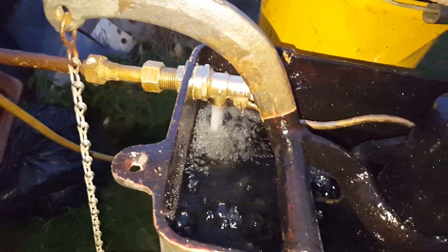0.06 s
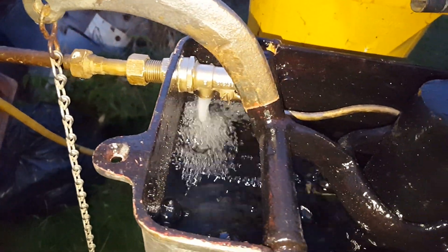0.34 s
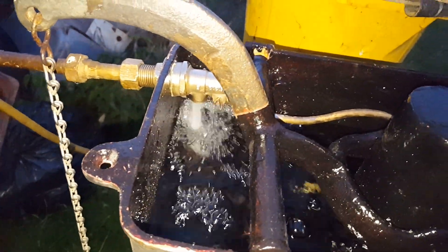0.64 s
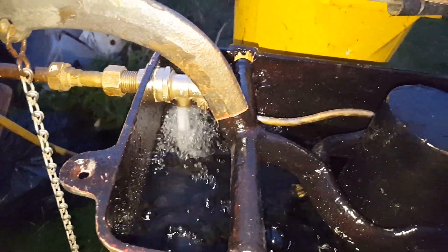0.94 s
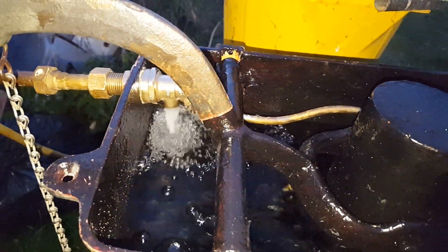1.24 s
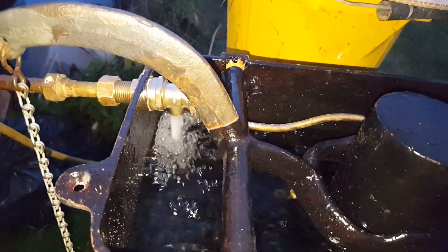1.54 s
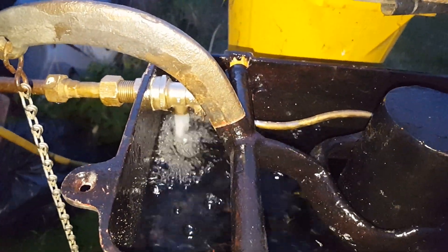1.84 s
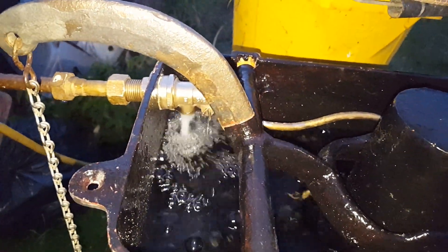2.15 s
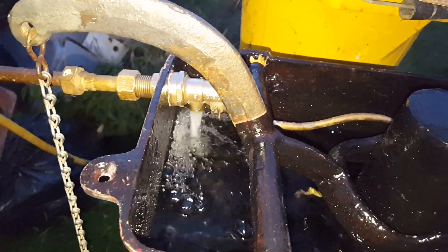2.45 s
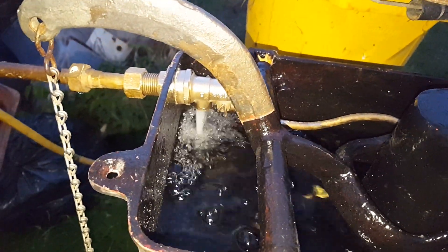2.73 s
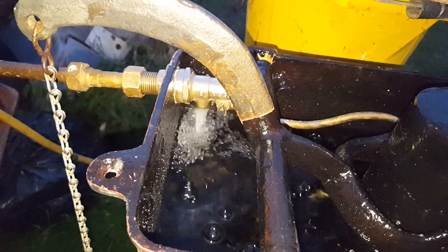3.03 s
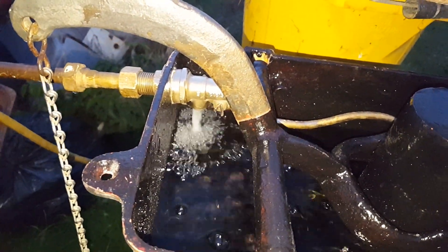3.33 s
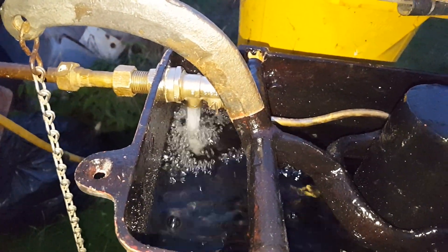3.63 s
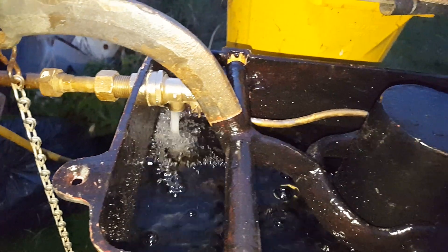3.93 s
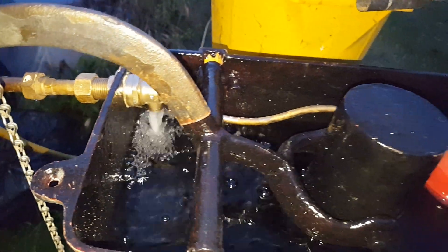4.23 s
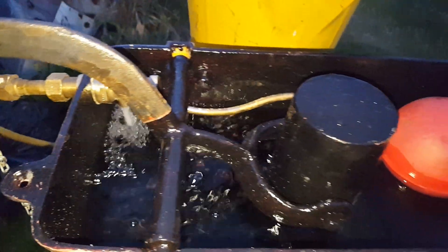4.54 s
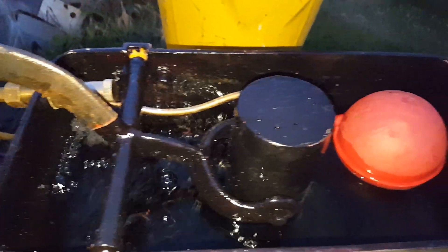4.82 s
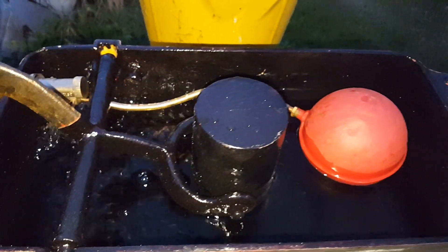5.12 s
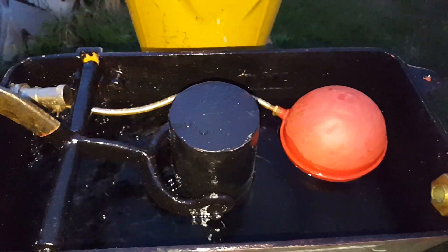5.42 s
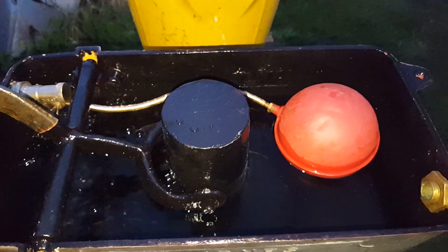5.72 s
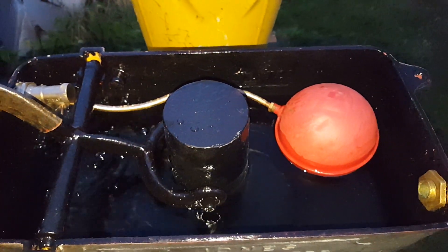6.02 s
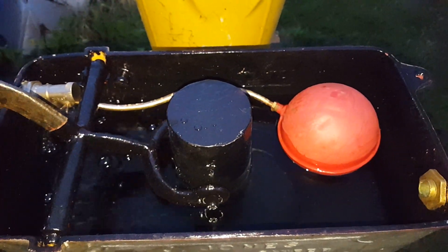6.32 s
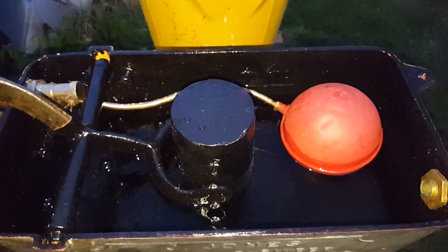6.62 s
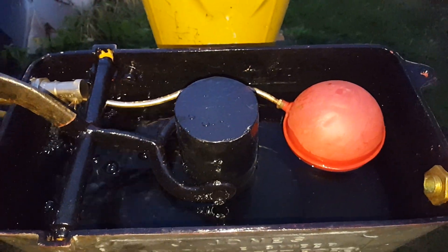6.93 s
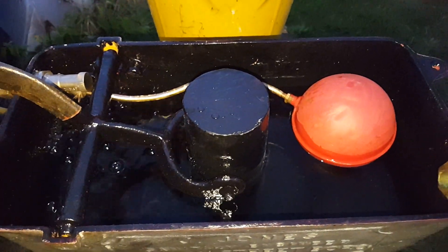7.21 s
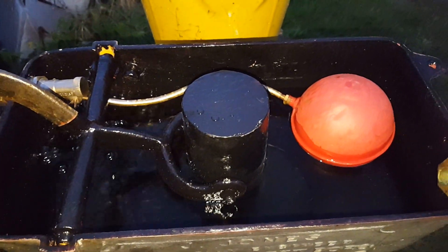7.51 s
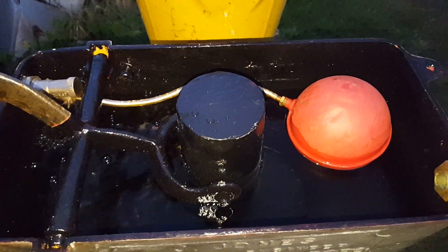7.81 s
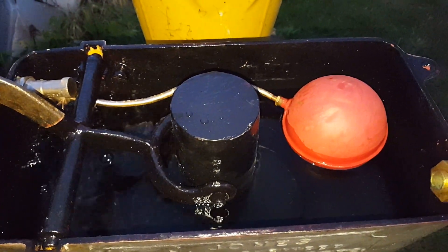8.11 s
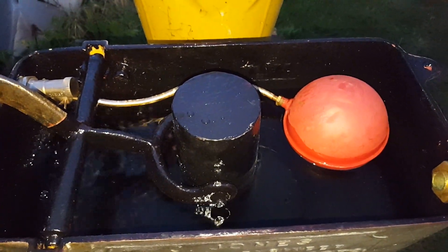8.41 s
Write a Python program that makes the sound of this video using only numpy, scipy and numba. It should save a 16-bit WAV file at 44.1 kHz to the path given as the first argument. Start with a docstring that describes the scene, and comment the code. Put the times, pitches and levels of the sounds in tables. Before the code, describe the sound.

Close up, a sputtering jet of water pours into a metal tank, its bright spray and bubbling ringing against the walls. Big gulps plop at uneven intervals over a soft hollow boom that slowly climbs in pitch. Midway the microphone pulls back to face the whole tank, and the water goes on more quietly with lighter plops and splats. A faint outdoor hum lies beneath.

```python
"""Outdoors at an old metal cistern, a float valve sprays water in over a faint low hum.
The wobbling jet hisses as spray or plunges and gurgles; drops and bubbles ring the tank's walls.
Big gulps plop, and the hollow boom of the air over the water climbs as the tank fills.
The listener starts right over the valve, then draws back to face the whole cistern."""
import sys
import numpy as np
from scipy import signal
from scipy.fft import rfft, irfft
from scipy.io import wavfile
from scipy.ndimage import uniform_filter1d
from numba import njit

SR = 44100
rng = np.random.default_rng(int(sys.argv[2]) if len(sys.argv) > 2 else 0)


def generate_wav(signal):
    """Clip the signal to [-1, 1] and save it as 16-bit WAV at the path in sys.argv[1]."""
    frames = np.transpose(np.atleast_2d(signal))
    scaled = np.clip(frames, -1, 1) * 32767
    pcm = np.round(scaled).astype(np.int16)
    wavfile.write(sys.argv[1], SR, pcm)


N = 377496
TIME = np.arange(N) / SR

# the listener's move, 0 = over the valve, 1 = drawn back: time_s, distance, treble_tilt_db_per_octave
LISTENER = [(0, 0, -3.5), (.7, 0.12, 0.5), (2.2, .05, -0.5), (3, 0, -2), (4.1, .15, -0.5),
            (4.7, 0.39, -1.5), (5.3, 0.93, -5.5), (6.6, 0.99, 0), (8.56, 1, .5)]
# tank resonances, close up and drawn back: pitch_hz, width_hz, left_db, right_db, left_lead_rad
TANK_MODES_NEAR = [(709, 282, -6.0, -7.0, 0.38), (920, 306, -9.5, -5.5, 0), (1110, 200, -8.5, -6, 1.6),
                   (1373, 440, -5, -4.5, 0.7), (1590, 245, -8.2, -0.6, 3), (1815, 215, -0.6, -3, 1.42),
                   (2000, 150, -12, -9, -3), (2300, 370, -11.3, -8.7, 1.43), (2790, 470, -4, -14, 3),
                   (3000, 540, -19.2, -6, 2.5), (3306, 184, -4.5, -12.5, -1.1), (3650, 396, -10, -12, 2),
                   (4276, 237, -11, -15, -3), (4960, 432, -14, -12.5, 2.4), (5358, 850, -15, -19, -2),
                   (5760, 244, -12.5, -16, -0.5), (6250, 650, -14.5, -15, 1.3), (6936, 325, -15.8, -19, -4),
                   (9180, 930, -9.5, -44.6, -0.92), (11400, 1648, -29.7, -23, 2.5)]
TANK_MODES_BACK = [(687, 350, -11, -11.5, 1.47), (1055, 337, -1.1, -4.5, 1.48),
                   (1240, 210, -2.9, -1.3, 1.68), (1543, 170, -0.5, -4, 3.5), (1670, 160, -2.9, -15, -4.5),
                   (1837, 178, 5, -7, 1), (2003, 87, 4, -1, 1.64), (2400, 440, -5, -8, 2.5),
                   (2550, 223, -4.5, -3, -2.5), (2800, 390, -11, -7, 2.5), (3040, 360, -18, -6, -0.8),
                   (3276, 270, -9, -9, -2.05), (3709, 510, -15.5, -12.5, 0.45),
                   (4220, 424, -14.5, -22.3, 0.1), (4706, 670, -17.0, -16, 0.5),
                   (5500, 430, -9.5, -15.6, -3.5), (6710, 390, -8, -9, -1.16),
                   (7290, 590, -12.0, -11.5, -0.5), (7815, 893, -19, -21.5, 1.1),
                   (8300, 522, -17.9, -25, 1.8), (13369, 1600, -14.5, -44.5, 0.14)]
# diffuse fill between the resonances, close up and drawn back: pitch_hz, left_db, right_db
DIFFUSE_NEAR = [(200.0, -44, -47), (600.0, -18, -34.8), (2000.0, -35, -28.7), (4080, -12, -16),
                (6500.0, -14.5, -16.5), (8000.0, -18, -21.5), (10500.0, -14, -36), (12600, -13, -23.5),
                (14200, -15.5, -25), (16000.0, -21, -31)]
DIFFUSE_BACK = [(200.0, -40, -42.0), (600.0, -20, -23.5), (2000.0, -19.5, -21.5), (4000.0, -25.4, -22.5),
                (6440, -12.5, -13.5), (8000.0, -16.5, -36.4), (10500.0, -18, -34.1), (12500.0, -17.5, -25),
                (14000.0, -21, -29), (16000.0, -20, -32.3)]
# a band out of phase between the ears, sliding with the listener: time_s, pitch_hz, share, width_hz
ANTIPHASE_BAND = [(0, 2080, 0, 70), (1, 2100, 1, 55), (3, 2120, 0.5, 65), (4, 2120, 1, 80),
                  (4.85, 2190, 0.98, 150), (5.1, 2320, 1, 165), (5.5, 2540, 0.77, 170),
                  (7.1, 2530, 0.5, 170), (7.45, 2680, 1, 150), (8.56, 2690, 1, 150)]
# the jet's bed, fainter as the listener draws back: time_s, gurgle_db, spray_db
JET_LEVELS = [(0, -34.5, -35), (.7, -33, -37), (2.1, -37.5, -38), (3.3, -36.5, -38.5), (4.15, -38, -40),
              (4.5, -39.5, -40.5), (5.3, -40, -44), (6.4, -42, -43.5), (8.56, -42.5, -44)]
# passing boosts and cuts of pitch bands in the water's tone, some heard as brief whistles:
# middle_s, half_length_s, pitch_hz, width_ratio, gain_db
TONE_ACCENTS = [(0.155, 0.42, 8650, 0.2, 6.5), (.5, .35, 2660, 0.2, 4.5), (1.338, 0.048, 3300, 0.032, 6),
                (1.5, 0.35, 1880, 0.058, 3), (2.937, 0.24, 9100, 0.11, 4.5), (4.48, 0.36, 3540, 0.073, 4.5),
                (4.6, 0.42, 3000, 0.075, -7), (4.713, 0.38, 4600, 0.15, 4), (5.5, 0.69, 14000, 0.19, 6),
                (5.1, .8, 980, .13, 3), (5.3, 0.72, 10100, 0.18, 8), (5.7, .35, 3700, 0.095, 5),
                (6.084, 0.03, 3830, 0.15, 13)]
# the air space over the water: time_s, level_db, pitch_hz, width_hz
AIR_SPACE = [(0, -46.5, 258, 176), (2.2, -49, 287, 138), (3.1, -50, 306, 121), (4.9, -50, 332, 109),
             (5.8, -51, 342, 120), (6.2, -56, 359, 190), (7.9, -54.5, 443, 260)]
# outdoor rumble with a hum in it: pitch_hz, relative_db
RUMBLE_SPECTRUM = [(15, -32), (30, -22), (43, -5), (55, -10), (65, 2), (78, -3.5), (120, -11), (200, -6.5),
                   (400, -7.5), (2000, -62)]
# big gulps of air, higher as the tank fills: start_s, boom_db, slap_db, pitch_hz
GULPS = [(.11, -28, -33, 242), (0.638, -29, -31, 280), (1.624, -26, -20, 276), (2.37, -33, -24, 295),
         (2.528, -27.5, -37, 304), (2.832, -28.5, -28, 308), (3.063, -24.5, -19, 313),
         (3.239, -29, -30, 316), (3.387, -25, -24, 324), (3.755, -24, -19, 315), (3.931, -32, -35, 325),
         (4.38, -30, -24, 340), (4.848, -25, -28, 336), (5.639, -33, -30, 345), (5.835, -36, -29, 372),
         (6.035, -40, -46, 370), (6.329, -38, -44, 370), (6.605, -41, -31, 447), (6.776, -35.5, -34, 456),
         (6.911, -37, -38, 410), (7.722, -36, -40, 660), (7.875, -40, -35, 495), (8.068, -32, -40, 480),
         (8.294, -36, -36, 467)]
# the jet falls in one piece (a negative dip is a spurt): middle_s, length_s, spray_dip_db, gurgle_swell_db
JET_PLUNGES = [(.417, .032, 6, 2), (.472, .028, 7, 3.5), (0.627, 0.027, 4.5, 3.5), (0.9, 0.021, 7, 4),
               (0.953, 0.023, 8, 1.5), (1.08, 0.06, 4, 1.5), (1.18, 0.028, 4.5, 1), (1.457, 0.12, 4, 2.5),
               (1.57, .031, 4, 5.5), (1.747, .023, 1, 5), (1.86, 0.088, 4.5, 5), (2.02, 0.048, 6.5, 5.5),
               (2.382, 0.012, 3, 5.5), (3.439, 0.035, 4.5, 2.5), (3.514, 0.052, 5.5, 4.5),
               (3.614, 0.043, 7.5, 3), (3.768, 0.07, 9, 3), (3.866, 0.022, 1, 4), (4.013, 0.032, 10, 6),
               (4.072, 0.021, 6, 4.5), (4.112, 0.03, 8, 7), (4.185, 0.048, 7, 4), (4.656, 0.024, 3, 3.5),
               (5.162, 0.053, 7, 0.5), (5.758, 0.064, 9, 3.5), (5.904, 0.066, 9, 3),
               (6.08, 0.043, -4.5, -2), (6.123, 0.022, 4, 6), (6.238, 0.028, 0, 3), (6.641, 0.08, 8.5, 3.5),
               (7.174, 0.036, 4.5, 2), (8.042, 0.048, 6.5, 2), (8.393, .063, 3.5, 3)]
# single drops that tick above the spray: start_s, level_db, pitch_hz, t60_s
DROP_TICKS = [(.529, -25, 6000, .009), (4.1, -18.5, 6550, 0.0044), (4.137, -13, 1280, 0.0048),
              (6.777, -25, 1180, .007), (7.054, -22.5, 7000, 0.0081)]
# soft low bumps: start_s, level_db, pitch_hz
LOW_BUMPS = [(0.762, -50, 148), (2.092, -43, 94), (2.36, -43, 103), (4.14, -48, 79.6)]
# lumps of water that land with a dull splat: start_s, swell_db
WATER_LUMPS = [(5.281, 4), (5.545, 2), (5.64, 8), (5.838, 7), (5.995, 1), (6.606, 7), (6.776, 5.5),
               (6.909, 12), (6.971, 7), (7.09, 8), (7.155, 5), (7.315, 7), (7.38, 7.5), (7.729, 6),
               (7.882, 7.5), (7.998, 6), (8.149, 8), (8.294, 9)]


def amp(db):
    """Decibels to gain."""
    return 10 ** (np.asarray(db) / 20)


def unit_rms(x):
    """Scales to rms 1."""
    return x / np.sqrt(np.mean(x ** 2) + 1e-20)


def curves(rows, t):
    """The columns of a time table at the times t."""
    s, *columns = np.transpose(rows)
    return [np.interp(t, s, c) for c in columns]


def spectra(rows, hz):
    """The columns of a frequency table at hz, on a log axis."""
    f, *columns = np.transpose(rows)
    return [np.interp(np.log(hz + 1), np.log(f), c) for c in columns]


def add(mix, s, sound):
    """Mixes a sound in at s seconds."""
    part = mix[max(round(s * SR), 0):][:len(sound)]
    part += sound[:len(part)]


def band(x, low_hz, high_hz):
    """A gentle band-pass."""
    return signal.sosfilt(signal.butter(2, [low_hz, high_hz], "band", fs=SR, output="sos"), x)


def lowpass(x, hz, order):
    """A zero-phase low-pass, run forward and back."""
    return signal.sosfiltfilt(signal.butter(order, hz, fs=SR, output="sos"), x)


def wander(slow_hz, fast_hz):
    """Random motion of rms 1, about equally strong in each octave between two rates."""
    hz = np.fft.rfftfreq(N, 1 / SR)
    slope = (hz > slow_hz) / np.sqrt(hz + slow_hz) / (1 + (hz / fast_hz) ** 4)
    return unit_rms(irfft(rfft(rng.standard_normal(N)) * slope, N))


def drift(shape, bins, frames):
    """A random field of rms 1, smoothed over so many pitch bins and time frames."""
    field = uniform_filter1d(rng.standard_normal(shape), bins, axis=0)
    return unit_rms(uniform_filter1d(field, frames, axis=1))


def resonate(x, hz, width_hz):
    """A resonance that follows the curve hz."""
    turn = np.exp(2j * np.pi * np.cumsum(hz) / SR)
    pole = np.exp(-np.pi * width_hz / SR)
    return 2 * (turn * signal.lfilter([1 - pole], [1, -pole], x / turn)).real


def damped_tone(hz, t60_s, attack_s):
    """A dying sine with a soft attack."""
    t = TIME[:SR // 4]
    return amp(-60 * t / t60_s) * (1 - np.exp(-t / attack_s)) * np.sin(2 * np.pi * hz * t)


@njit
def ring_bubbles(start, turns_per_sample, size, cycles, rise, length):
    """Each bubble rings as a damped tone whose pitch creeps up as it dies."""
    out = np.zeros(length)
    for k in range(len(start)):
        decay = turns_per_sample[k] / cycles
        phasor = size[k] + 0j
        step = np.exp(2j * np.pi * turns_per_sample[k] - decay)
        glide = np.exp(2j * np.pi * turns_per_sample[k] * decay * rise)
        for i in range(start[k], min(start[k] + int(4 / decay), length)):
            out[i] += phasor.imag
            phasor, step = phasor * step, step * glide
    return out


def bubbles(per_s, cycles, rise, spread_db):
    """A fizz of bubbles of every size, each pinging at its own pitch for a few cycles."""
    when, pitch, luck, sign = rng.random((int(per_s * N / SR), 4)).T
    hz = 400 + 13600 * pitch
    accent_db = spread_db * np.minimum(-np.log(1 - luck), 4.5)
    size = np.sqrt(hz) * np.sign(sign - 0.5) * amp(accent_db)
    start = (when * N).astype(np.int64)
    return unit_rms(ring_bubbles(start, hz / SR, size, float(cycles), float(rise), N))


def drop_clicks(per_s, spread_db):
    """Drops hit at random, most of them lightly and a few hard."""
    size = amp(spread_db * np.minimum(rng.exponential(1, N), 4.5))
    return size * rng.choice([-1, 1], N) * (rng.random(N) < per_s / SR)


def splash():
    """Two independent streams of bubbles, clicks and mist, fluttering together as the jet wobbles."""
    wobble, sputter, churn = wander(10, 53), wander(25, 130), wander(22, 80)
    streams = []
    for _ in range(2):
        pings = bubbles(per_s=6500, cycles=6, rise=0.04, spread_db=3.5)
        clicks = amp(-0.5) * unit_rms(drop_clicks(per_s=6000, spread_db=3.2))
        mist = amp(-4.5) * rng.standard_normal(N)
        water = pings + clicks + mist
        low = lowpass(water, hz=3000, order=4)
        high = water - low
        low += splats(water)
        # the wobble trades gurgle against spray
        streams.append(low * amp(0.61 * churn - 0.5 * wobble) + high * amp(1.21 * wobble + 0.4 * sputter))
    return unit_rms(np.array(streams))


def tank_colour(modes, diffuse, hz):
    """The tank's tone from one spot: left power, right power and the part both ears share."""
    centre_hz, width_hz, left_db, right_db, lead_rad = np.transpose(modes)
    peaks = (1 + (2 * (hz[:, None] - centre_hz) / width_hz) ** 2) ** -2
    left, right = amp(left_db), amp(right_db)
    fill_left, fill_right = amp(spectra(diffuse, hz))
    return np.array([peaks @ left ** 2 + fill_left ** 2,
                     peaks @ right ** 2 + fill_right ** 2,
                     peaks @ (left * right * np.exp(-1j * lead_rad))])


def tank(water, echo_below_hz, swing_rad):
    """The splash rings the tank, whose tone shifts with the listener; gives ear spectra and mid power."""
    hz, t, (main, other) = signal.stft(water, SR, nperseg=1024, noverlap=768)
    distance = curves(LISTENER, t)[0]
    near = tank_colour(TANK_MODES_NEAR, DIFFUSE_NEAR, hz)[..., None]
    back = tank_colour(TANK_MODES_BACK, DIFFUSE_BACK, hz)[..., None]
    left, right, shared = near * (1 - distance) + back * distance
    left, right, hz = left.real, right.real, hz[:, None]
    # two narrow bands go out of phase between the ears: one slides, one opens with distance
    for centre_hz, share, width_hz in (curves(ANTIPHASE_BAND, t), (1496, distance, 70)):
        opposed = share * np.exp(-((hz - centre_hz) / width_hz) ** 4)
        left, right = left + opposed * (right - left) / 2, right + opposed * (left - right) / 2
        shared = shared * (1 - opposed) - opposed * np.sqrt(left * right)
    # wall echoes bring the same splash to the right ear by shifting paths; the finest mist stays apart
    echo_share = 1 / (1 + (hz / echo_below_hz) ** 1.4)
    echo = main * np.exp(1j * swing_rad * drift(main.shape, bins=14, frames=260))
    diffuse = np.sqrt(1 - echo_share) * other + np.sqrt(echo_share) * echo
    unshared = np.sqrt(abs(left * right - abs(shared) ** 2))
    ears = np.array([main * left, main * shared + diffuse * unshared]) / np.sqrt(left)
    mid_power = (left + right + 2 * shared.real) / 4 / len(hz)
    return hz, t, ears, mid_power


def bubble_cloud(hz, t, swell_db, spray_hz=3230, plunge_hz=1950, width_octaves=0.3, wander_octaves=0.21):
    """A hump in dB that wanders with bubble size; a plunge makes them larger, so it swells and dives."""
    depth = 1 - np.exp(-swell_db / 2.5)
    pitch, strength = (drift((1, len(t)), bins=1, frames=9) for _ in range(2))
    centre_hz = spray_hz * (plunge_hz / spray_hz) ** depth * 2 ** (wander_octaves * pitch * (1 - depth))
    height_db = 3.5 * (1 + strength / 2) + 0.57 * swell_db
    hump_db = height_db * np.exp(-(np.log2((hz + 1) / centre_hz) / width_octaves) ** 2)
    return hump_db - hump_db.mean(1, keepdims=True)


def jet(hz, t, ears, mid_power, cloud_pan, patchy_db, ripple_db):
    """The jet splits into low gurgle and high spray; its bubble cloud sits a little to the right."""
    gurgle_db, spray_db = curves(JET_LEVELS, t)
    dip_db, swell_db = plunges(t)
    cloud_db = bubble_cloud(hz, t, swell_db)
    tilt_db = curves(LISTENER, t)[1] * np.log2(np.maximum(hz / 3500, 1))
    colour = amp(cloud_db + tilt_db)
    for middle_s, half_s, pitch_hz, width, gain_db in TONE_ACCENTS:
        accent = np.exp(-((t - middle_s) / half_s) ** 2 - ((hz / pitch_hz - 1) / width) ** 2)
        colour *= amp(gain_db * accent)
    power = mid_power * colour ** 2
    # ride each band to its level; a plunge swells the gurgle mostly above 600 Hz
    reach = hz ** 2 / (hz ** 2 + 600 ** 2)
    gurgle_gain = amp(gurgle_db + swell_db * reach) / np.sqrt((power * (hz > 550) * (hz < 2600)).sum(0))
    ragged = 1 + 0.35 * drift(power.shape, bins=70, frames=4)  # stray drops land through a plunge
    spray_gain = amp(spray_db - dip_db * ragged) / np.sqrt((power * (hz > 3500) * (hz < 15500)).sum(0))
    crossover_hz = 2860 - 25 * dip_db
    low = 1 / (1 + (hz / crossover_hz) ** 20)
    # the spray lands now here, now there, favouring other pitches; wall echoes ripple it at each ear
    patches = patchy_db * drift(power.shape, bins=24, frames=14) * hz ** 2 / (hz ** 2 + 2800 ** 2)
    ripples = ripple_db * np.array([drift(power.shape, bins=5, frames=60) for _ in ears]) * (1 - low)
    pan_db = cloud_pan * np.array([-cloud_db, cloud_db])
    ears = ears * colour * gurgle_gain ** low * spray_gain ** (1 - low) * amp(patches + ripples + pan_db)
    return signal.istft(ears, SR, nperseg=1024, noverlap=768)[1][:, :N]


def rumble(level_db, side_db):
    """A distant bed of hum and rumble, nearly the same on both sides."""
    colour = amp(spectra(RUMBLE_SPECTRUM, np.fft.rfftfreq(N, 1 / SR))[0])
    mid, side = irfft(rfft(rng.standard_normal((2, N))) * colour, N)
    return amp(level_db) * unit_rms(mid + amp(side_db) * np.array([side, -side]))


def hollow_boom(slap_db):
    """Heavy drops slap the surface and set the air over the water booming."""
    level_db, hz, width_hz = curves(AIR_SPACE, TIME)
    drops = drop_clicks(per_s=260, spread_db=3.0)
    narrow, wide = (unit_rms(resonate(resonate(drops, hz, width), hz, width))
                    for width in (width_hz.min(), width_hz.max()))
    blend = (width_hz - width_hz.min()) / np.ptp(width_hz)
    slaps = amp(slap_db) * unit_rms(band(band(drops, 590, 1090), 590, 1090))
    return amp(level_db) * (narrow * (1 - blend) + wide * blend + slaps)


def plops(spatter_db):
    """A gulp slaps the surface and spatters, and the hollow rings on."""
    out, t = np.zeros(N), TIME[:SR // 4]
    for start_s, boom_db, slap_db, hz in GULPS:
        crack = band(rng.standard_normal(len(t)) * np.exp(-t / 0.0004), 520, 2000)
        spatter = unit_rms(band(rng.standard_normal(len(t)), 656, 810)) * np.exp(-t / 0.0071)
        slap = amp(slap_db) * (crack / abs(crack).max() + amp(spatter_db) * spatter)
        boom = amp(boom_db) * damped_tone(hz, t60_s=0.065, attack_s=0.002)
        add(out, start_s, band(slap + boom, 210, 6000))
    return out


def plunges(t, swell_stretch=1.01):
    """The jet falls in one piece: how far the spray dips and the gurgle swells, in dB."""
    middle_s, length_s, dip_db, swell_db = np.transpose(JET_PLUNGES)
    offset = abs(2 * (t[:, None] - middle_s) / length_s)
    return 0.5 ** (offset ** 3) @ dip_db, 0.5 ** ((offset / swell_stretch) ** 3) @ swell_db


def ticks():
    """A single drop pinches off a bubble that rings briefly."""
    out = np.zeros(N)
    for start_s, level_db, hz, t60_s in DROP_TICKS:
        add(out, start_s, amp(level_db) * damped_tone(hz, t60_s, attack_s=0.5 / hz))
    return out


def bumps():
    """A few soft, low thuds under the water sound."""
    out = np.zeros(N)
    for start_s, level_db, hz in LOW_BUMPS:
        add(out, start_s, amp(level_db) * damped_tone(hz, t60_s=0.1, attack_s=0.0045))
    return out


def splats(water, decay_s=0.0093):
    """Each lump of water lands as a short, dull burst of extra splash."""
    bursts = np.zeros(N)
    for start_s, swell_db in WATER_LUMPS:
        add(bursts, start_s, (amp(swell_db) - 1) * np.exp(-(TIME[:SR // 10] / decay_s) ** 2))
    return bursts * lowpass(water, hz=1690, order=2)


def scene():
    """Wide water in the ringing tank, booms and drops in the centre, the outdoor bed beneath."""
    ringing = tank(splash(), echo_below_hz=3000, swing_rad=2.46)
    water = jet(*ringing, cloud_pan=0.17, patchy_db=2.0, ripple_db=2.0)
    bed = rumble(level_db=-62.5, side_db=-7)
    return water + bed + hollow_boom(slap_db=-2.5) + plops(spatter_db=-7.5) + ticks() + bumps()


def record(dry, cutoff_hz=15900):
    """A steep low-pass trims the very top of the hiss."""
    taps = signal.firwin(511, cutoff_hz, window=("kaiser", 9), fs=SR)
    return signal.oaconvolve(dry, taps[None], "same")


dry = scene()
out = record(dry)
generate_wav(out)
```